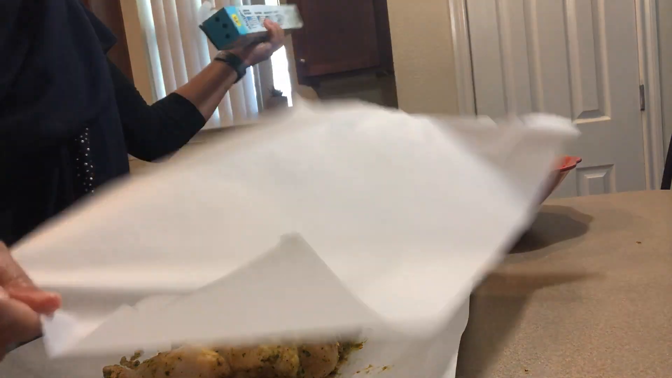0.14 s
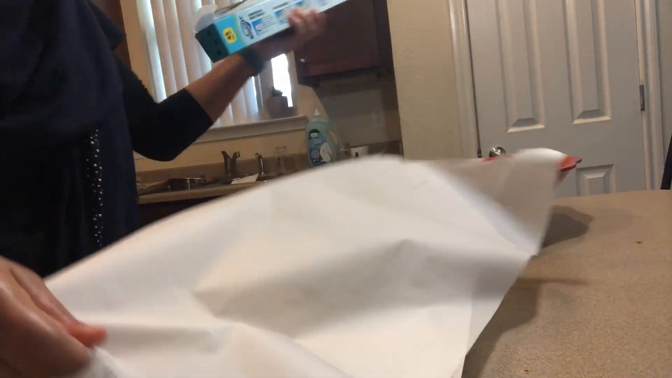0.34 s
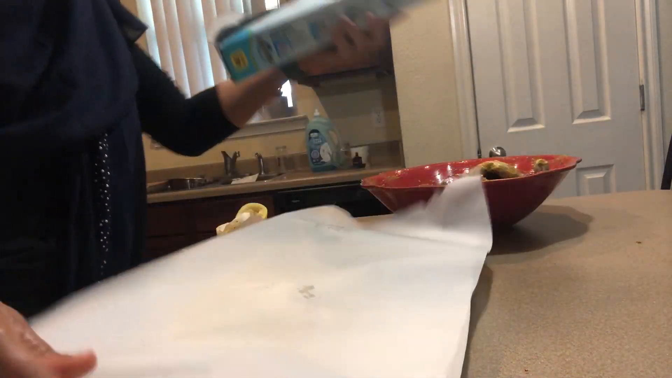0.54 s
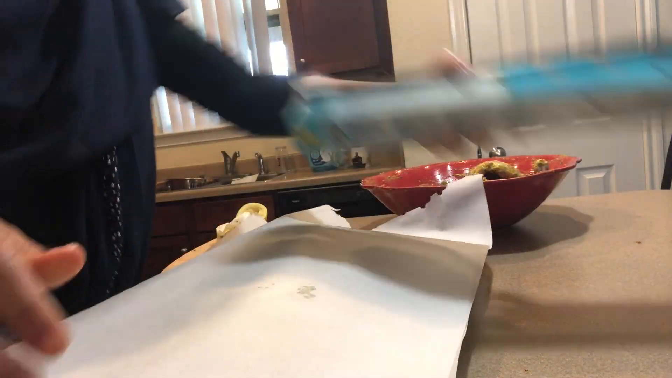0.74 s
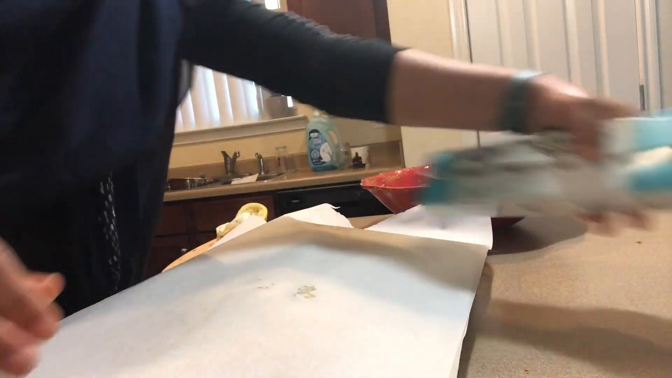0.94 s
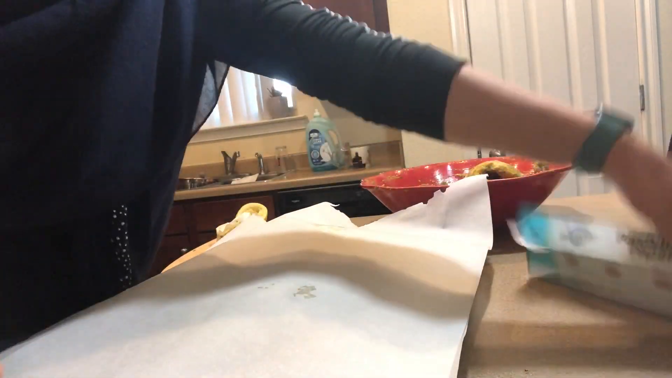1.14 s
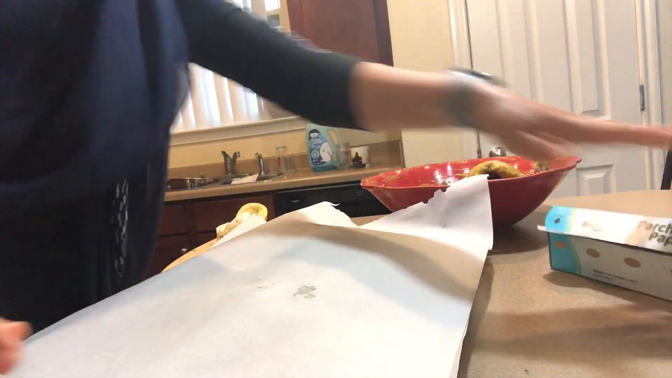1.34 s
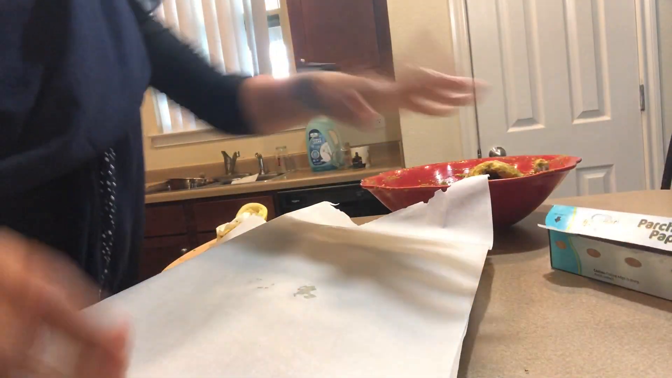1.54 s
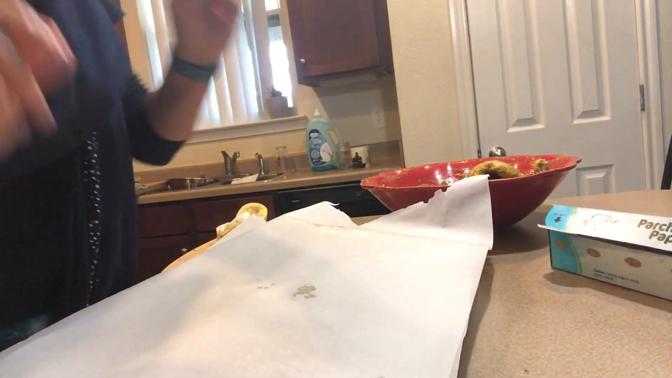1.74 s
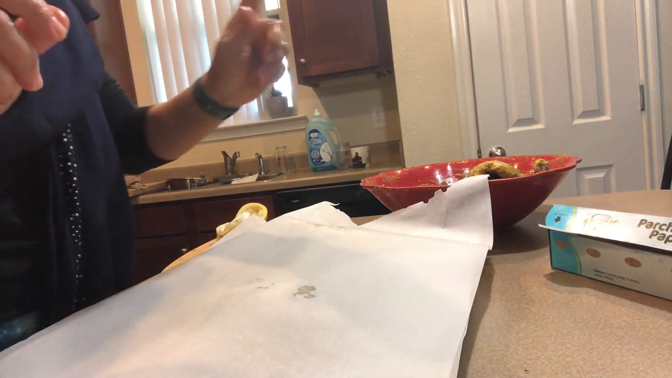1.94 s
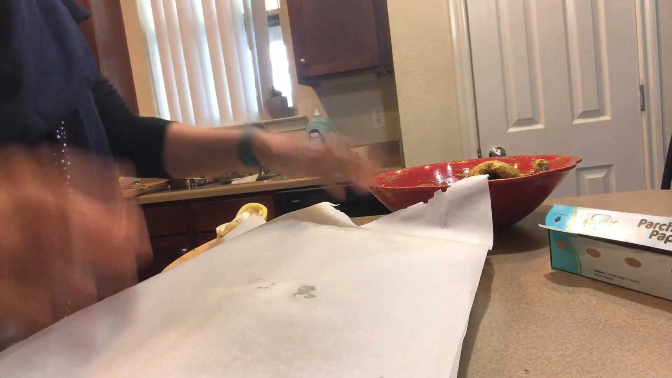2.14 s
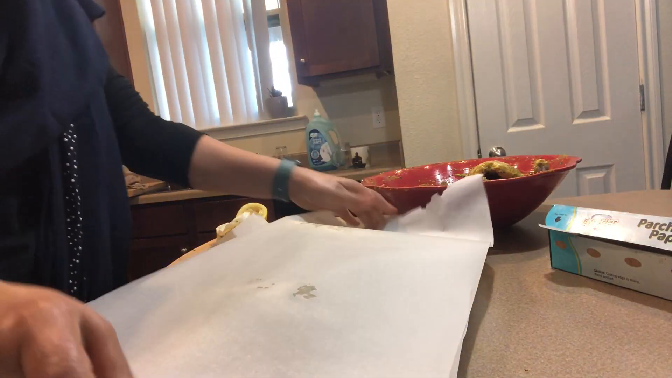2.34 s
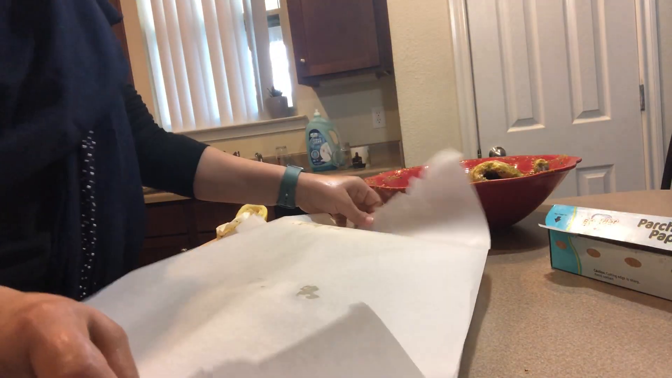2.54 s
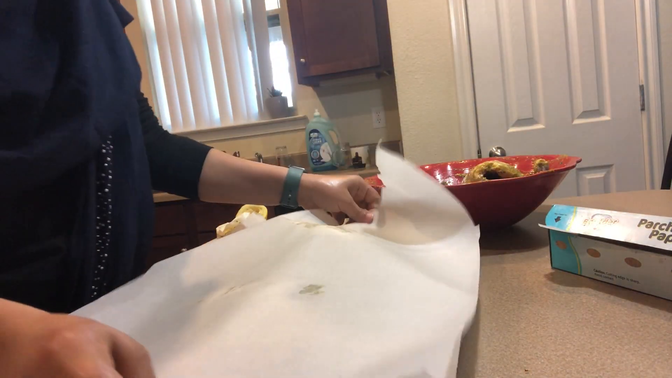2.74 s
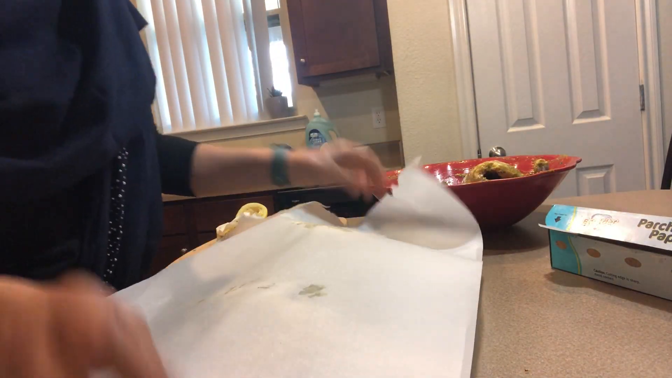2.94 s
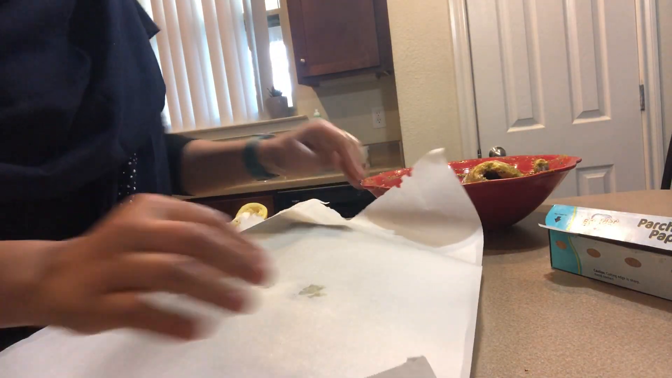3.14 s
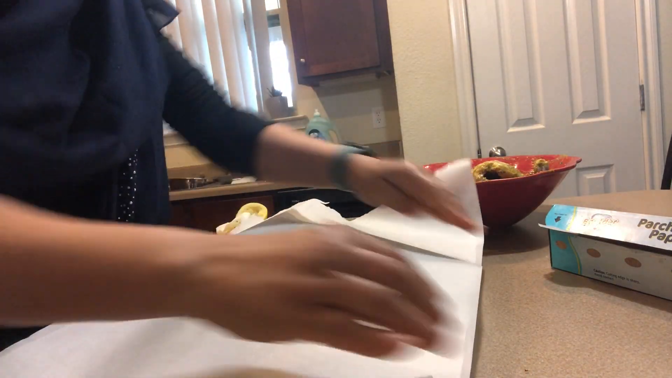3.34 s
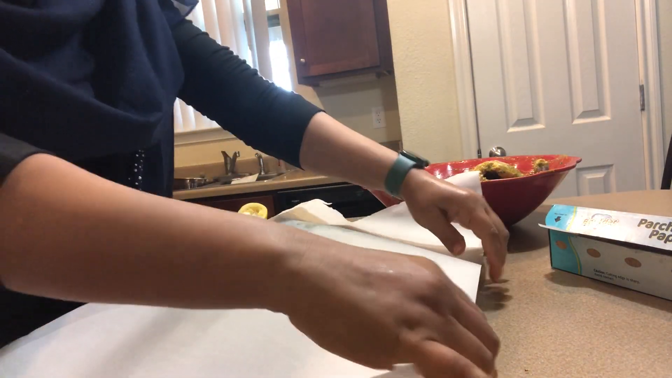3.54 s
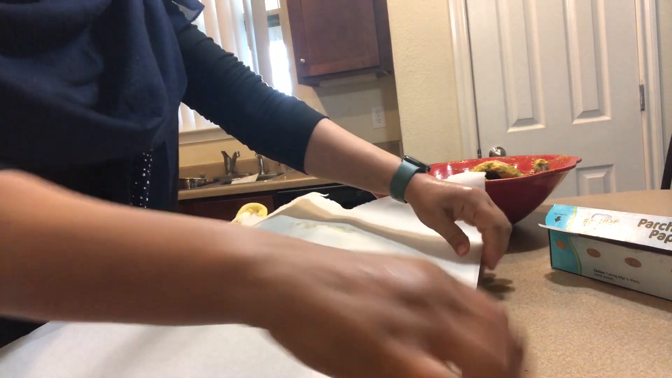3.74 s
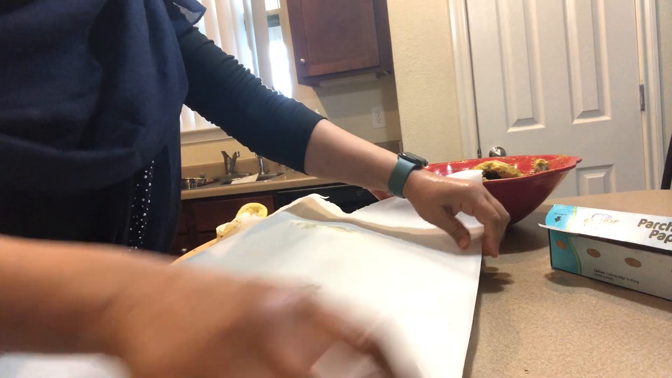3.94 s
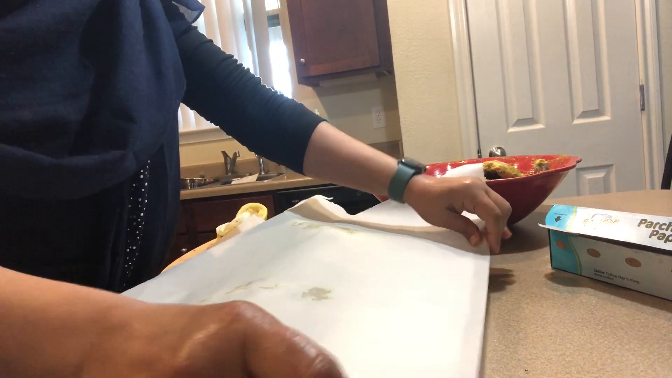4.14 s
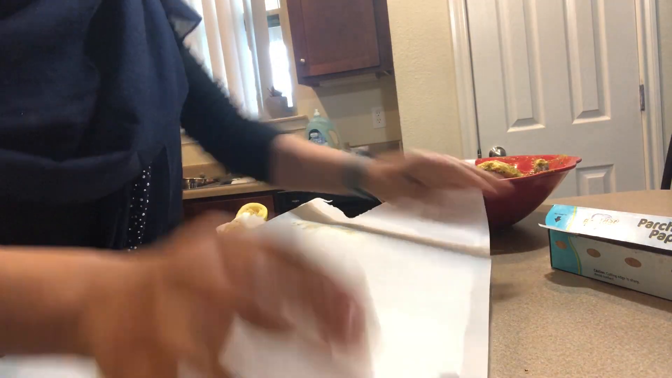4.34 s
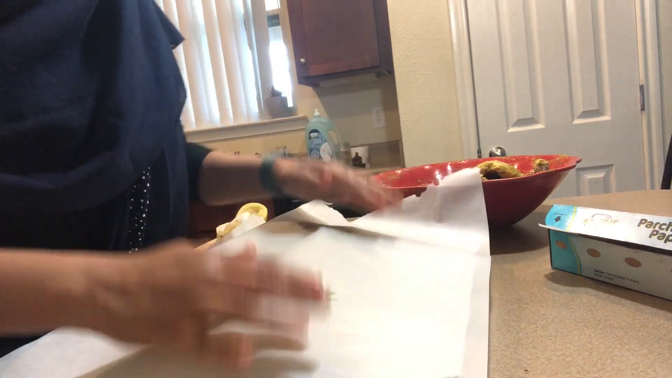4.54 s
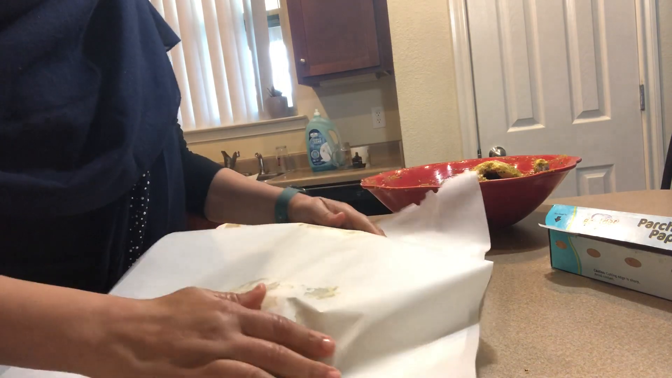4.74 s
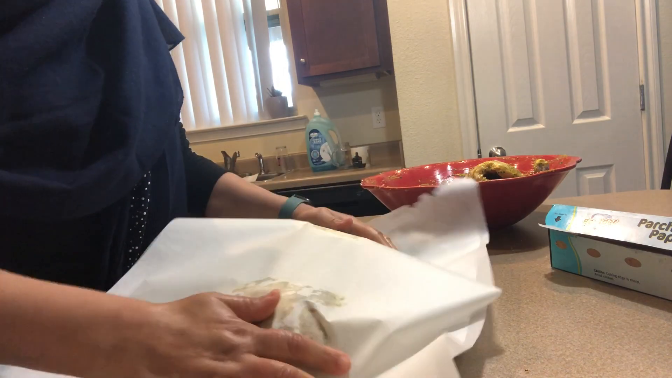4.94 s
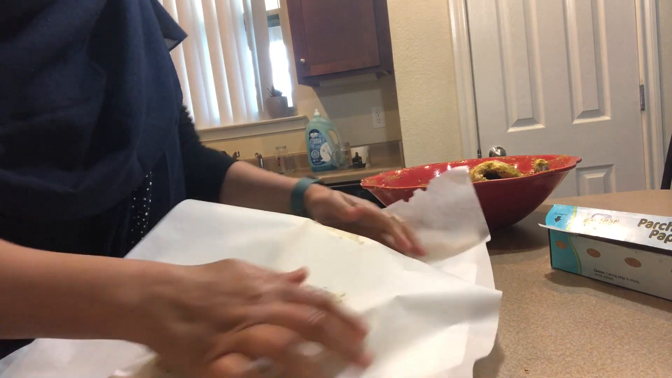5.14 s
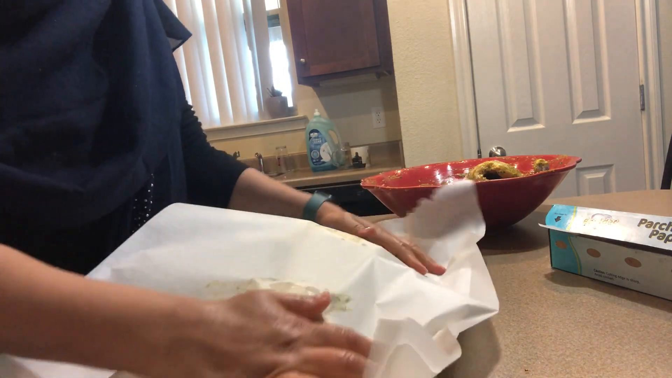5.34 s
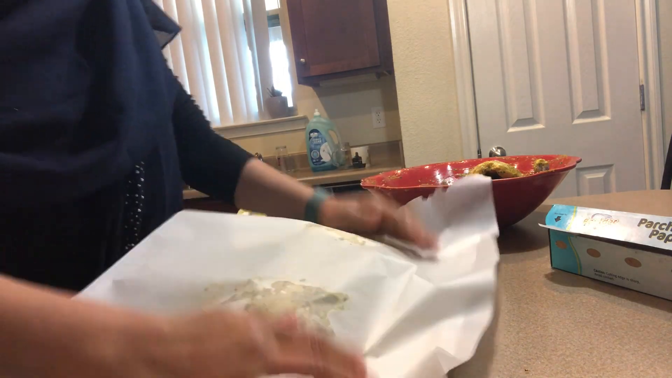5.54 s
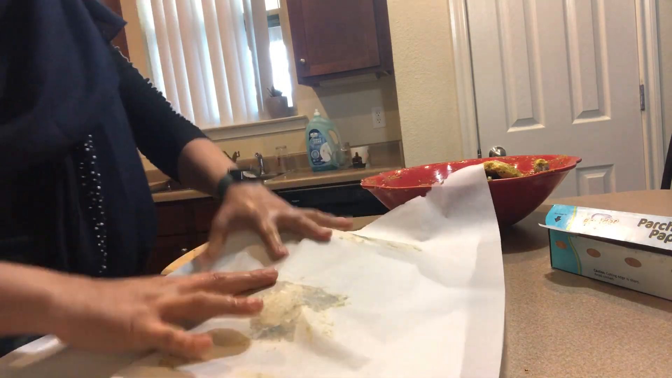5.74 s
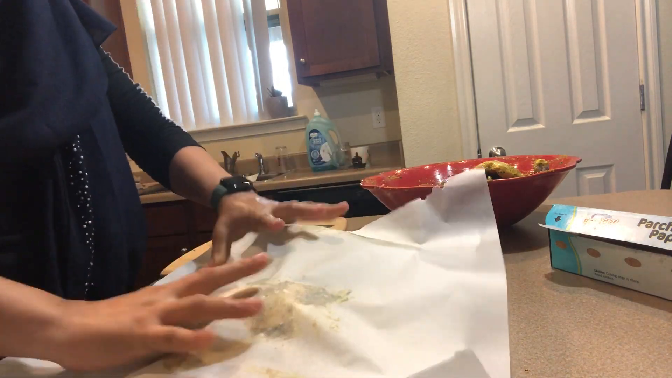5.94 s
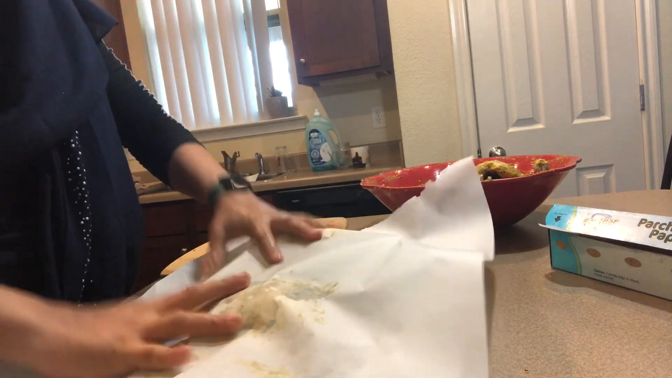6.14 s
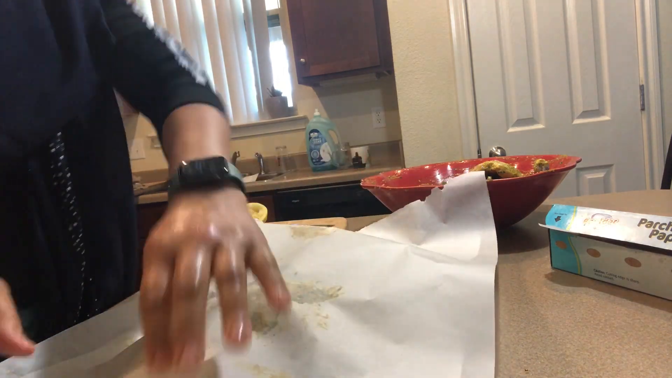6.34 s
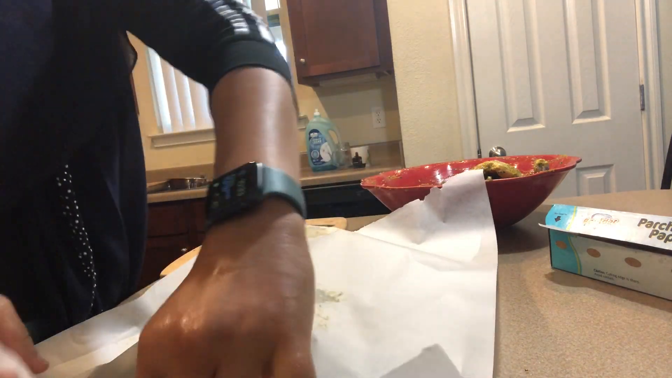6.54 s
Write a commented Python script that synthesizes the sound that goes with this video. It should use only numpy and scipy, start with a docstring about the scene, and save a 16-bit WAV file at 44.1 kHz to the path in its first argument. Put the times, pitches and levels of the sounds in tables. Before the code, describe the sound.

Baking paper crackles as it is laid out, a cardboard box clatters onto a counter, then the sheet is pressed down with loud crinkling.

```python
"""Baking paper and a cardboard box on a kitchen counter.

Hands lift, lay and press a sheet: showers of short noise-burst buckles over a rubbing hiss.
A box knocks the counter (noise pushes into decaying modes); the roll inside it rattles (noise bands).
Appliance tones and room noise lie behind; a small hard room adds noise-like echoes.
Near the end an edit joins a second, brighter microphone with less bass."""
import sys
import numpy as np
from scipy import signal
from scipy.fft import rfft, irfft, next_fast_len
from scipy.io import wavfile
from scipy.ndimage import uniform_filter1d

SR = 44100
rng = np.random.default_rng(int(sys.argv[2]) if len(sys.argv) > 2 else 0)


def master_out(mix):
    """Clip the mix to full scale and print it as 16-bit PCM to the path in sys.argv[1]."""
    frames = np.transpose(np.atleast_2d(mix))
    ceiling = np.clip(frames, -1, 1)
    pcm = np.round(ceiling * 32767).astype(np.int16)
    wavfile.write(sys.argv[1], SR, pcm)


N = 295029

# hand strokes on the sheet: start_s, end_s, crackle_db, rise_s (to 20 dB), fall_s (to 20 dB), mids_rel_db
STROKES = [(0.0, 0.02, -18.0, 0.01, 0.139, -7.0), (0.141, 0.143, -22.5, 0.01, 0.019, -7.0),
           (0.179, 0.286, -37.0, 0.052, 0.14, -4.5), (0.283, 0.307, -35.5, 0.036, 0.027, -5.0),
           (0.373, 0.47, -44.5, 0.053, 0.029, -3.5), (0.488, 0.49, -20.5, 0.008, 0.036, -7.5),
           (0.49, 0.517, -32.5, 0.039, 0.188, -3.0), (0.648, 0.656, -33.0, 0.023, 0.137, 0.0),
           (0.771, 0.814, -58.0, 0.06, 0.498, 2.5), (0.872, 0.892, -49.5, 0.043, 0.043, 1.5),
           (1.032, 1.034, -39.5, 0.045, 0.007, -1.0), (1.068, 1.1, -46.0, 0.028, 0.01, 3.5),
           (2.214, 2.324, -57.0, 0.006, 0.029, 3.5), (2.386, 2.411, -48.5, 0.051, 0.067, 1.0),
           (2.502, 2.504, -41.5, 0.209, 0.255, -0.5), (2.589, 2.682, -39.0, 0.028, 0.052, -2.5),
           (2.715, 2.717, -25.5, 0.043, 0.051, -5.0), (2.793, 2.852, -40.5, 0.051, 0.157, 1.5),
           (3.023, 3.026, -54.5, 0.019, 0.077, 1.0), (3.39, 3.41, -60, 0.008, 0.04, 5),
           (3.441, 3.443, -57.5, 0.096, 0.067, 2.5), (3.504, 3.544, -42.0, 0.022, 0.032, -3.0),
           (3.678, 3.68, -45.5, 0.111, 0.198, 0.0), (3.959, 3.965, -52.5, 0.012, 0.039, 3.5),
           (4.016, 4.021, -41.5, 0.083, 0.031, 2.0), (4.09, 4.115, -41.5, 0.047, 0.255, 0.5),
           (4.317, 4.319, -47.0, 0.017, 0.038, 3.5), (4.377, 4.535, -68, 0.049, 0.02, 2.0),
           (4.558, 4.56, -20.5, 0.006, 0.122, -6.5), (4.613, 4.701, -26.0, 0.034, 0.066, -5.0),
           (4.741, 4.798, -37.5, 0.054, 0.017, -2.5), (4.827, 4.829, -27.5, 0.034, 0.025, -3.5),
           (4.918, 4.971, -27.5, 0.118, 0.027, -2.5), (4.994, 4.996, -19.0, 0.039, 0.043, -5.5),
           (5.099, 5.101, -23.5, 0.081, 0.036, -6.0), (5.171, 5.173, -35.0, 0.008, 0.027, -6.0),
           (5.213, 5.241, -21.5, 0.025, 0.067, -6.5), (5.27, 5.272, -17.5, 0.102, 0.131, -6.0),
           (5.387, 5.484, -41.0, 0.02, 0.03, -2.0), (5.448, 5.478, -34.5, 0.009, 0.031, -1.5),
           (5.525, 5.527, -24.0, 0.035, 0.03, -1.5), (5.554, 5.574, -30.5, 0.023, 0.055, -5.0),
           (5.689, 5.691, -30.0, 0.004, 0.077, -10.5), (5.735, 5.762, -28.0, 0.01, 0.151, -5.0),
           (5.869, 5.871, -29.5, 0.01, 0.039, -4.0), (5.916, 5.968, -37.0, 0.025, 0.025, -6.0),
           (5.99, 6.009, -30.0, 0.012, 0.136, -4.0), (6.104, 6.106, -27.0, 0.019, 0.015, -3.5),
           (6.151, 6.194, -37.0, 0.05, 0.036, -2.0), (6.2, 6.202, -55.5, 0.01, 0.104, -2.0),
           (6.303, 6.399, -62, 0.024, 0.02, -1.5), (6.407, 6.454, -46.0, 0.01, 0.017, -2.5),
           (6.482, 6.486, -28.5, 0.024, 0.016, -6.5), (6.502, 6.538, -39.5, 0.02, 0.017, 1.0),
           (6.553, 6.602, -37.5, 0.009, 0.023, -2.0), (6.584, 6.593, -33.5, 0.015, 0.022, -4.0),
           (6.651, 6.69, -42.0, 0.058, 0.05, -1.5)]
# single buckles that stand out: time_s, relative_peak_db, centre_hz
SNAPS = [(.0258, -4, 6200), (.0541, -7, 5070), (.0874, -11, 4620), (.141, -6, 5540), (.2076, -17, 7900),
         (.2623, -9, 7340), (.3669, -29, 4700), (.4758, -19, 4570), (.4868, -7, 6520), (.5496, -18, 7360),
         (.6477, -17, 7710), (.7502, -23.5, 7730), (1.0287, -19, 10800), (1.1511, -6, 7900),
         (1.1674, -20, 8600), (1.27, -12.5, 7490), (1.2866, -17, 7000), (1.349, -31, 7910),
         (1.787, -46, 7970), (1.8053, -36, 8300), (1.8801, -45, 7830), (2.1271, -46, 5110),
         (2.2222, -32, 4460), (2.3955, -23, 6030), (2.3545, -36, 4260), (2.479, -25, 4830),
         (2.598, -21.5, 5510), (2.6444, -21, 6500), (2.69, -22, 5030), (2.7128, -6, 7540),
         (2.8095, -18.5, 5240), (2.882, -24, 7240), (3.0178, -35.5, 6200), (3.9457, -32, 4400),
         (4.018, -25, 4860), (4.226, -23, 5690), (4.3041, -31, 4980), (4.5633, -11, 4680),
         (4.6008, -4, 7600), (4.702, -10.5, 8700), (4.7905, -16, 9070), (4.8267, -7, 8400),
         (4.849, -12, 8590), (4.8686, -13, 8340), (4.8992, -6, 10300), (4.9074, -7, 9930),
         (4.942, -7, 7000), (4.963, -9, 9790), (4.9946, -.5, 9300), (5.0765, -10, 9700), (5.085, -15, 7710),
         (5.1021, -7.5, 8460), (5.1692, -12.5, 7400), (5.1884, -7, 8200), (5.1985, -5, 8550),
         (5.214, -5, 9000), (5.2507, .5, 8200), (5.24, -13, 7990), (5.262, -11, 6560), (5.269, -5, 7150),
         (5.28, -9, 9100), (5.293, -4, 9150), (5.3284, -19, 8350), (5.3882, -14, 13500),
         (5.4348, -9, 13700), (5.4622, -10.5, 14900), (5.5096, -5, 13800), (5.552, -16, 12200),
         (5.5694, -13, 13300), (5.689, -12, 10600), (5.7349, -11, 11200), (5.8177, -17, 4550),
         (5.835, -15, 10900), (5.8656, -8.5, 10900), (5.9376, -12.5, 14500), (5.992, -17, 3930),
         (5.9984, -15, 9540), (6.064, -15, 14900), (6.1053, -10.5, 11300), (6.1613, -11, 10000),
         (6.2647, -29, 9200), (6.308, -27, 8390), (6.3148, -23.5, 7840), (6.4082, -26.5, 9250),
         (6.4647, -18, 12600), (6.4786, -11, 12500), (6.5266, -21, 3550), (6.553, -12.5, 10600),
         (6.6366, -16.5, 10500), (6.6559, -19, 9350)]
# sheet spectrum through each microphone: frequency_hz, relative_density_db (per Hz)
SHEET_FIRST_MIC = [(200, -15.5), (380, -7.5), (520, -9.5), (750, -5), (1050, 0.5), (1500, -4), (2100, -3),
                   (2900, -12.5), (4500, -3), (6000, -7.5), (8500, -0.5), (11500, -14.5), (13000, -19),
                   (16000, -30.5)]
SHEET_SECOND_MIC = [(120, -42), (200, -12), (244, -3.5), (352, -21), (691, 0.5), (959, -13.5), (1110, -0.5),
                    (1540, -4.5), (1880, 3), (5520, -12), (15600, -2)]
# highest treble, above about 11 kHz, over time: time_s, level_db (relative to the crackle)
HIGHEST_TREBLE = [(0, -55), (.15, -38), (.55, -27), (1.05, -23), (2.25, -26), (2.4, -27), (2.85, -44),
                  (3.1, -25), (3.5, -19), (3.72, -31), (4.05, -21), (4.7, -25), (4.9, -16), (5.05, -26),
                  (5.36, -16), (5.385, 6), (5.6, -1), (6.15, 1), (6.3, -6), (6.5, 3), (6.69, 0)]
# box or sheet knocking the counter: time_s, peak_db, pitch_region_hz, contact_ms
KNOCKS = [(0.642, -31, 350, 3.3), (.703, -25.5, 370, 22), (.73, -25.5, 312, 9.6), (.91, -32, 880, 3.3),
          (1.1066, 1, 856, 2.2), (1.1244, -10, 700, 2.3), (1.1375, -28, 300, 2), (1.1489, 5, 1320, 2.3),
          (1.153, -9.5, 320, 3.2), (1.166, -7, 950, 2), (1.189, -13, 332, 2), (1.239, -12, 280, 4.1),
          (1.263, -17, 450, 2), (1.269, -10.5, 490, 5.6), (1.286, -14, 353, 3), (1.331, -24, 420, 3.8),
          (1.458, -27, 1244, 3.2), (1.639, -46.5, 1300, 3), (1.744, -42, 1800, 4), (1.809, -37.5, 1630, 5),
          (1.834, -37, 1200, 4), (1.85, -49, 2820, 6), (1.99, -48, 2500, 2.2), (5.456, -33.5, 240, 2.6),
          (5.524, -25.5, 590, 5.6), (5.542, -25.5, 260, 6.9)]
# cardboard modes: frequency_hz, relative_level_db, t60_s
BOX_MODES = [(232, -8, 0.028), (310, -10, 0.023), (352, -3, 0.051), (439, -5, 0.038), (710, 0.5, 0.025),
             (824, -2, 0.014), (1110, 6.5, 0.012), (1550, 3, 0.013), (2220, -14.5, 0.01),
             (2850, -20.5, .01)]
# roll shaking in the box: start_s, end_s, low_rattle_db, rise_s (to 20 dB), fall_s (to 20 dB), mids_rel_db
SHAKES = [(1.113, 1.145, -26, .003, .006, 0), (1.17, 1.195, -21, .04, .035, -7),
          (1.24, 1.286, -23, .012, .03, -3), (1.315, 1.325, -40, .03, .07, -2),
          (1.41, 1.47, -54, .04, .12, 6), (1.6, 1.65, -68, .02, .03, 6), (1.73, 1.8, -64, .02, .03, 8),
          (1.805, 1.855, -66, .01, .02, 15), (1.88, 2.0, -70, .03, .05, 5)]
# appliance tones before and after the edit: frequency_hz, level_db, waver_db
HUM_FIRST = [(59.4, -53.5, 1.7), (121, -67.5, 2.5), (216.3, -63.5, 2.5), (340, -67, 1)]
HUM_SECOND = [(117, -50, 0.76), (170, -66, 4), (242, -71, 2.5)]
# room noise before and after the edit: frequency_hz, relative_density_db (per Hz)
AIR_FIRST = [(25, -35), (60, -17), (120, -9), (250, -18), (400, -19.5), (550, -27), (1100, -33),
             (2200, -40.5), (4200, -42.5), (7500, -43.5), (12000, -54.5), (15600, -57.5)]
AIR_SECOND = [(40, -50), (90, -16), (160, -16), (300, -11), (600, -16.5), (1000, -25), (2500, -42),
              (6000, -45), (15600, -37)]

AIR_FIRST_DB, AIR_SECOND_DB = -56.5, -51.5
LOUDER_S, LOUDER_DB = 3.34, 3.5  # first background steps up
EDIT_S, FADE_OUT_S, FADE_IN_S = 5.369, .02, .014
ROOM_T60_S, ROOM_DB, ROOM_DULL_HZ = 0.36, -14.5, 5900
BASS_CUT_HZ, TOP_HZ = 130, 15750
SNAP_BODY_DB = -12  # mids of a buckle against its peak
SHAKE_TREBLE_DB = -12  # against the low rattle, when that is at -22 dB
TREBLE_DB_PER_DB = .15  # gentle shakes are more papery
BEND = 1.6  # above 1: rounded top, ever faster ending


def sheet_colours(centres_hz, anchors):
    """Relative band levels through both microphones, with unit power in each pitch region."""
    colours = []
    for table in (SHEET_FIRST_MIC, SHEET_SECOND_MIC):
        colour = on_log(centres_hz, table) + 10 * np.log10(centres_hz)  # density to band level
        regions = ((3, 11), (11, 17), (11, 17), (17, 19))  # band indices, one pair per anchor
        share_db = [10 * np.log10(np.sum(undb(2 * colour[a:b]))) for a, b in regions]
        colours.append(colour - np.interp(np.log(centres_hz), anchors, share_db))
    return colours


def sheet(buckles_per_s=700, mean_size_db=1.5, largest_db=6.5, reach_oct=.9, decay_cycles=2.4,
          shortest_s=0.00024, rub_share=0.44, gentle_db=-46.0, snap_db=-13.0, snap_s=0.00054,
          veil_db=13.5, slip_db=2.2):
    """Every buckle is a short noise burst with its own pitch region; rubbing fills the gaps."""
    t = np.arange(N) / SR
    crackle_db, body_db = swells(STROKES)
    treble_db = np.interp(t, *np.transpose(HIGHEST_TREBLE))
    centres_hz = 250 * 2 ** (np.arange(19) / 3)
    anchors = np.log([2000, 3200, 10000, 12700])
    first_colour, second_colour = sheet_colours(centres_hz, anchors)

    draw = rng.random((int(buckles_per_s * N / SR), 3)).T
    buckle_s = draw[0] * N / SR
    # few large creases, many small
    size = undb(2 * np.minimum(-mean_size_db * np.log(1 - draw[1]), largest_db))
    pitch_hz = 500 * 2 ** (5 * draw[2])
    # a light touch slides more than it creases
    rub = rub_share + (1 - rub_share) / (2 + 2 * undb(crackle_db - gentle_db))
    slip = slip_db * walk(40)  # the fingers drag unevenly
    snap_at_s, peak_db, snap_hz = np.transpose(SNAPS)

    out = np.zeros(N)
    for k, hz in enumerate(centres_hz):
        low = np.interp(np.log(hz), anchors, [1, 0.062, 0, 0])
        high = np.interp(np.log(hz), anchors, [0.018, 0.0043, 0.087, 0.89])
        decay_s = shortest_s + decay_cycles / (2 * np.pi * hz)
        shower = bursts(buckle_s, size * octave_band(hz, reach_oct)(pitch_hz), decay_s)
        shower = shower / (uniform_filter1d(shower, size=2000) + shower.mean() / 10)  # even local level
        colour_db = np.where(t > EDIT_S, second_colour[k], first_colour[k])
        level_db = crackle_db + low * body_db + high * treble_db + colour_db
        power = undb(2 * (level_db + slip)) * (rub + (1 - rub) * shower)

        snap_body = low * undb(2 * SNAP_BODY_DB) * octave_band(1300, .6)(hz) / 3
        snap_share = snap_body + (1 - low) * octave_band(hz, .7)(snap_hz)
        # the first microphone is dull on top
        snap_share *= np.where(snap_at_s < EDIT_S, undb(-2 * high * veil_db * hz / 16000), 1)
        power += bursts(snap_at_s, undb(2 * (peak_db + snap_db)) * snap_share, decay_s + snap_s)
        out += coloured(octave_band(hz, 0.22), np.sqrt(power))
    return out


def box(reach_oct=0.44, push_samples=1600):
    """Each knock is a short rough push into cardboard modes; its pitch region decides which ones ring."""
    out, t = np.zeros(N), np.arange(SR // 5) / SR
    draw = rng.standard_normal((len(KNOCKS), len(BOX_MODES) + push_samples))
    for (time_s, peak_db, strike_hz, contact_ms), d in zip(KNOCKS, draw):
        ring = np.zeros(len(t))
        for (hz, mode_db, t60_s), jitter in zip(BOX_MODES, d):
            gain = undb(mode_db + 1.0 * jitter) * octave_band(strike_hz, reach_oct)(hz)
            tone = np.sin(2 * np.pi * hz * (1 + 0.02 * jitter) * t)
            ring += gain * tone * np.exp(-np.log(1000) * t / t60_s)
        x = t[:push_samples] * 1000 / max(contact_ms, .3)  # time in contacts
        push = d[len(BOX_MODES):] * np.sqrt(x) * np.exp(-2 * x)
        hit = signal.fftconvolve(ring, push)
        hit = hit * undb(peak_db) / np.abs(hit).max()
        i = int(time_s * SR)
        out[i:i + len(hit)] += hit[:N - i]
    return out


def rattle(rough_db=2.5):
    """Loose, uneven shaking as noise bands: hollow lows, cardboard mids, a papery hiss."""
    low_db, mid_db = swells(SHAKES)
    clipped_db = low_db.clip(-70, 0)
    treble_db = SHAKE_TREBLE_DB - TREBLE_DB_PER_DB * (clipped_db + 22)
    light_db = -.2 * (clipped_db + 50)  # gentle contact rings the thin lid rather than the walls
    # relative_db, centre_hz, width_oct
    bands = ((0, 270, .48), (mid_db - 6, 680, .35), (mid_db - 1.5, 1200, .26),
             (mid_db - 10.5, 1800, .3), (mid_db - 14 + light_db, 2500, .17),
             (treble_db - 8, 4500, .4), (treble_db, 8000, .3))
    shake_db = rough_db * walk(90)
    out = np.zeros(N)
    for relative_db, hz, width_oct in bands:
        level_db = low_db + relative_db + shake_db + 2.0 * walk(150)
        out += coloured(octave_band(hz, width_oct), undb(level_db))
    return out


def room(x):
    """Dense echoes of a small hard kitchen, as decaying noise duller than the direct sound."""
    t = np.arange(int(ROOM_T60_S * SR)) / SR
    decay = np.exp(-np.log(1000) * t / ROOM_T60_S)
    tail = rng.standard_normal(len(t)) * decay * np.minimum(t / 0.0015, 1)
    tail = signal.sosfilt(signal.butter(1, ROOM_DULL_HZ, fs=SR, output="sos"), tail)
    tail = tail / np.sqrt(np.sum(tail ** 2))
    return x + undb(ROOM_DB) * signal.fftconvolve(x, tail)[:N]


def background(tones, air, air_db):
    """Appliance tones wavering in level and phase, over coloured room noise."""
    t = np.arange(N) / SR
    hum = np.zeros(N)
    for hz, level_db, waver_db in tones:
        level = np.sqrt(2) * undb(level_db + waver_db * walk(12))
        hum += level * np.sin(2 * np.pi * hz * t + .4 * waver_db * walk(6))
    noise = coloured(lambda f: undb(on_log(f, air)))
    return hum + undb(air_db + 1.0 * walk(5)) * noise


def swells(rows):
    """Overlapping movements that each rise, hold and die away: their level and mean mids, in dB."""
    t = np.arange(N) / SR
    start_s, end_s, db, rise_s, fall_s, mids_db = np.array(rows).T[..., None]
    outside = np.maximum((start_s - t) / rise_s, (t - end_s) / fall_s).clip(0, 5)
    power = undb(2 * (db - 20 * outside ** BEND))
    total = power.sum(axis=0)
    return 10 * np.log10(total), (power * mids_db).sum(axis=0) / total


def bursts(time_s, power, decay_s):
    """Power envelope: a jump at each time, dying away exponentially."""
    index = np.clip((time_s * SR).astype(int), 0, N - 1)
    train = np.bincount(index, power, N)
    return signal.lfilter([1], [1, -np.exp(-1 / (decay_s * SR))], train)


def walk(rate_hz):
    """Random levels held 1 / rate_hz seconds, smoothed twice, at rms 1."""
    k = int(SR / rate_hz)
    steps = np.repeat(rng.standard_normal(N // k + 1), k)
    return unit(uniform_filter1d(uniform_filter1d(steps, k), k)[:N])


def coloured(gain, shape=1):
    """Noise under a time shape, filtered by gain(Hz) with unit filter power."""
    size = next_fast_len(N)
    hz = np.maximum(np.arange(size // 2 + 1) * SR / size, 1)
    spectrum = rfft(shape * rng.standard_normal(N), size)
    return irfft(spectrum * unit(gain(hz)), size)[:N]


def octave_band(hz, octaves):
    """Bell-shaped gain on a log frequency axis."""
    return lambda f: np.exp(-np.log2(f / hz) ** 2 / (2 * octaves ** 2))


def on_log(hz, table):
    """Read a frequency_hz, level_db table on a log frequency axis."""
    f, db = np.transpose(table)
    return np.interp(np.log(hz), np.log(f), db)


def undb(db):
    """Decibels to gain; doubled decibels give power."""
    return 10 ** (np.asarray(db) / 20)


def unit(x):
    """Scale to rms 1."""
    return x / np.sqrt(np.mean(x ** 2))


def scene():
    """Two shots, each with its own background; the first fades out, then the second fades in."""
    t = np.arange(N) / SR
    bass_cut = signal.butter(2, BASS_CUT_HZ, "high", fs=SR, output="sos")
    near = signal.sosfilt(bass_cut, sheet() + box() + rattle())
    step_up = undb(LOUDER_DB * np.clip((t - LOUDER_S) / .03, 0, 1))
    first = room(near * (t < EDIT_S)) + step_up * background(HUM_FIRST, AIR_FIRST, AIR_FIRST_DB)
    second = room(near * (t > EDIT_S)) + background(HUM_SECOND, AIR_SECOND, AIR_SECOND_DB)
    fade_out = np.clip((EDIT_S - t) / FADE_OUT_S, 0, 1)
    fade_in = np.clip((t - EDIT_S) / FADE_IN_S, 0, 1)
    return (first * fade_out + second * fade_in)[None]


def record(dry):
    """The loudest peaks are clipped and rounded, and the top is cut off steeply."""
    x = np.clip(dry, -1.2, 1.2)
    top_cut = signal.ellip(10, .2, 60, TOP_HZ, fs=SR, output="sos")
    return signal.sosfilt(top_cut, x - x ** 3 / 4.4)


dry = scene()
out = record(dry)
master_out(out)
```